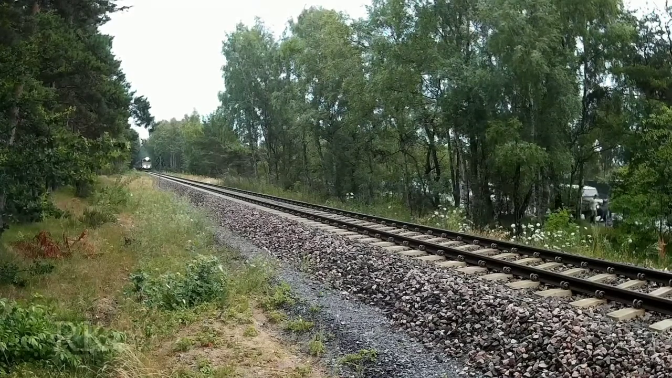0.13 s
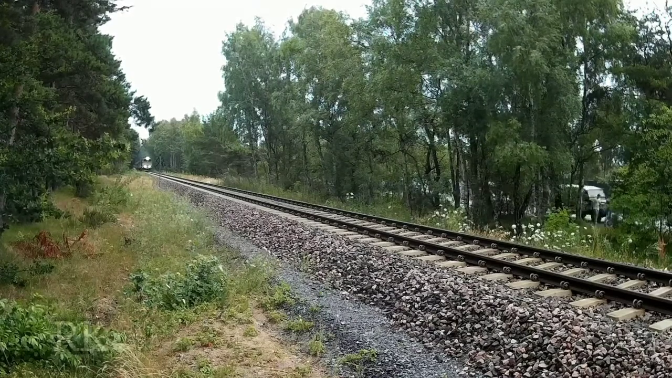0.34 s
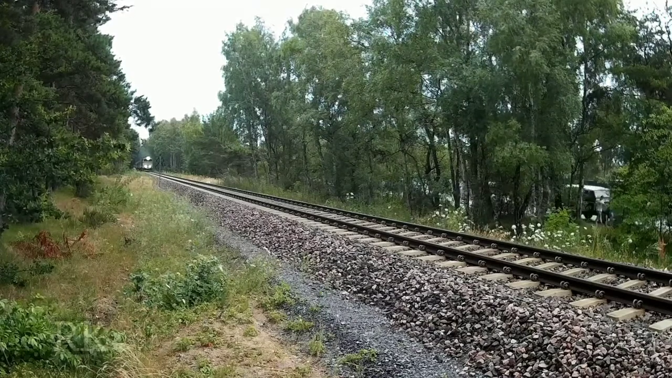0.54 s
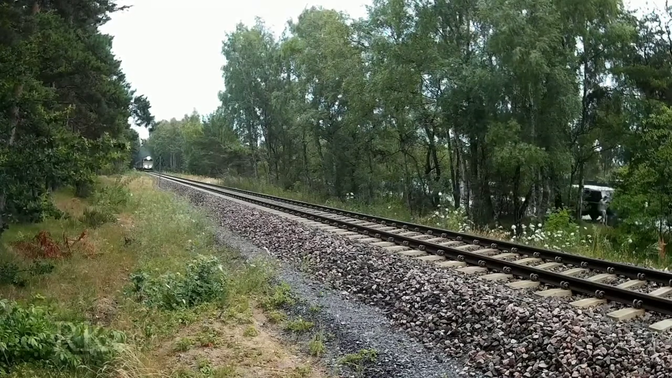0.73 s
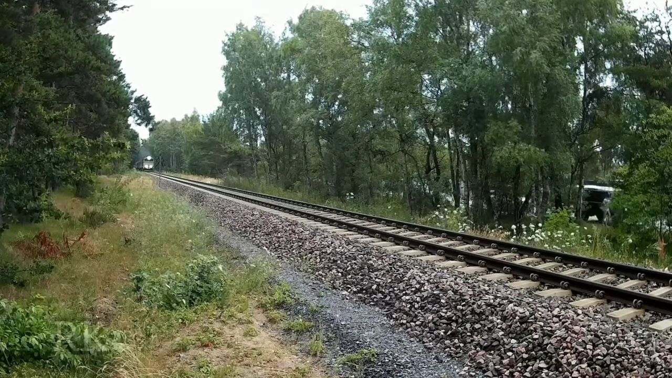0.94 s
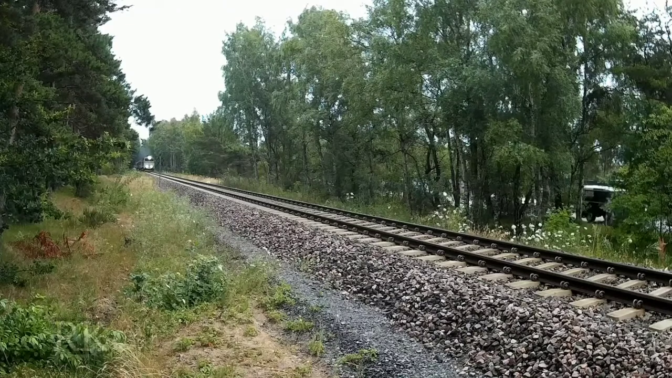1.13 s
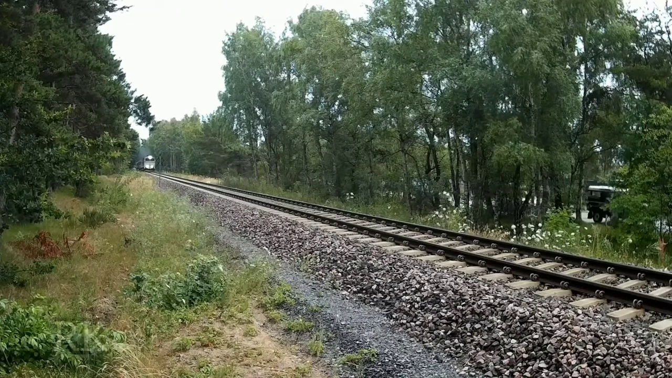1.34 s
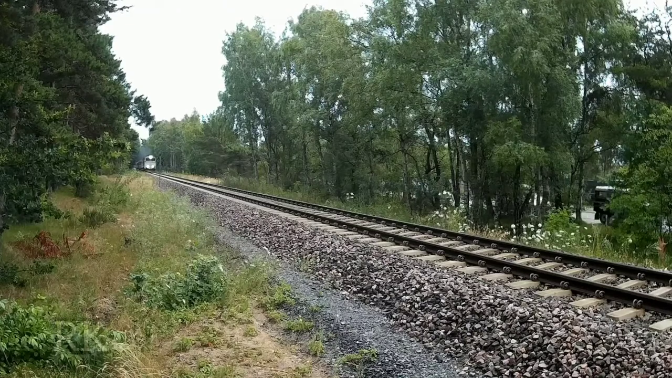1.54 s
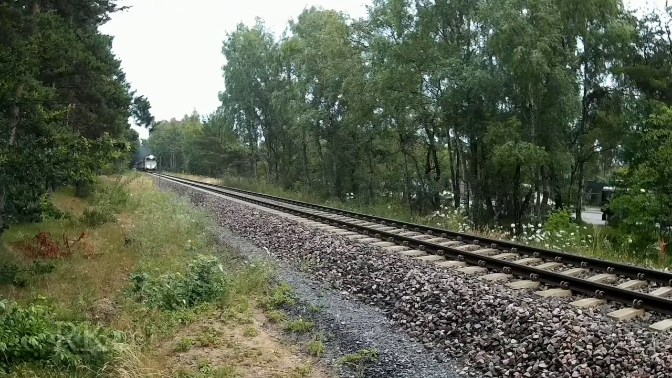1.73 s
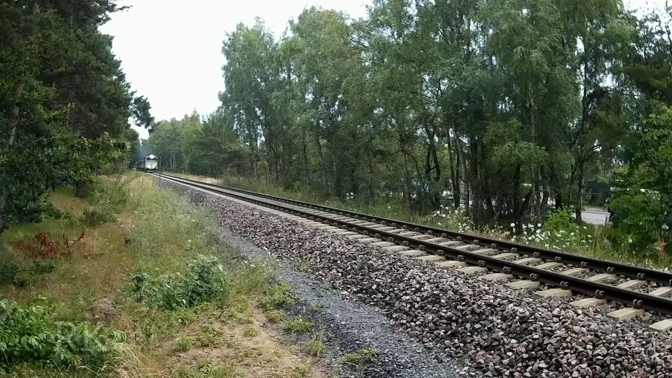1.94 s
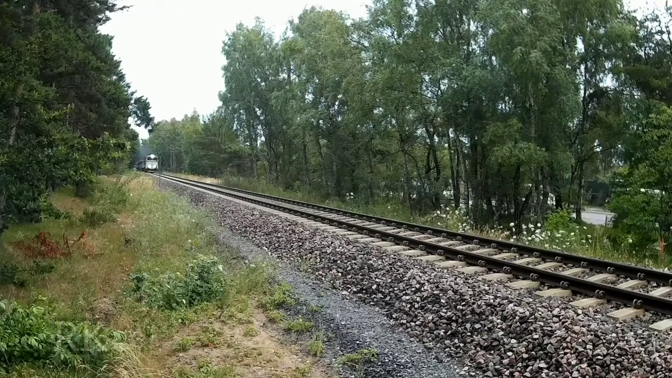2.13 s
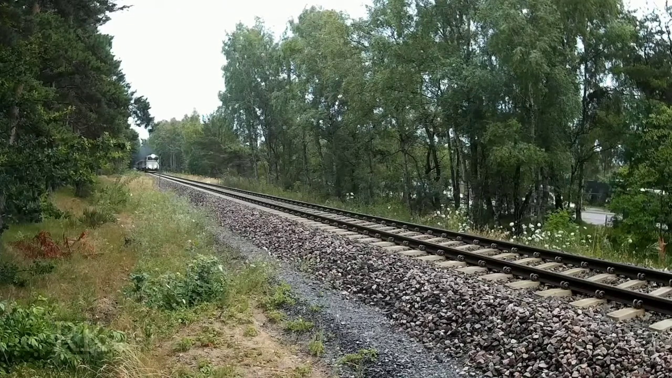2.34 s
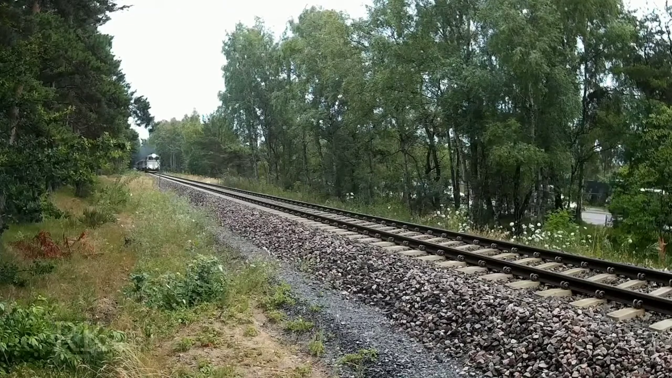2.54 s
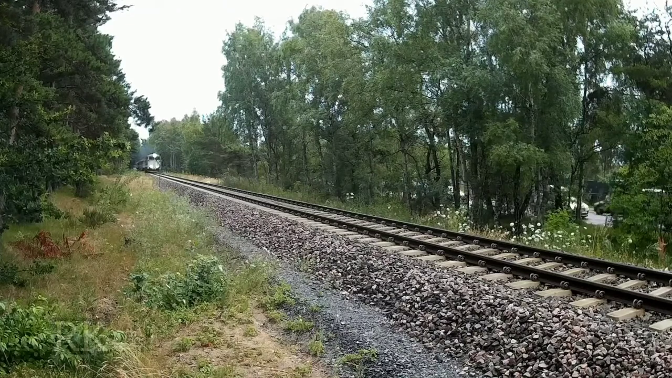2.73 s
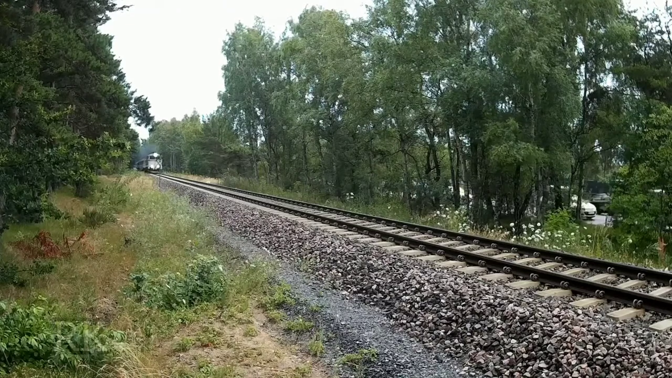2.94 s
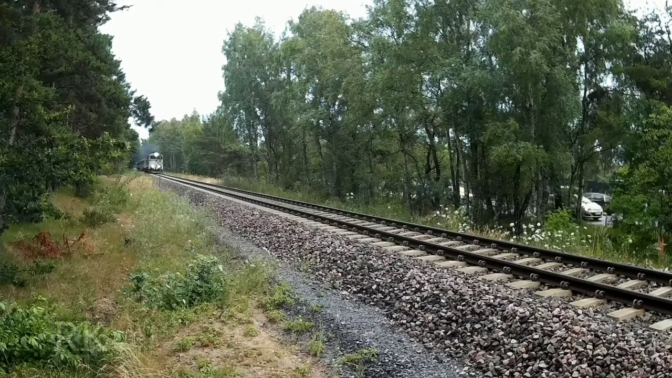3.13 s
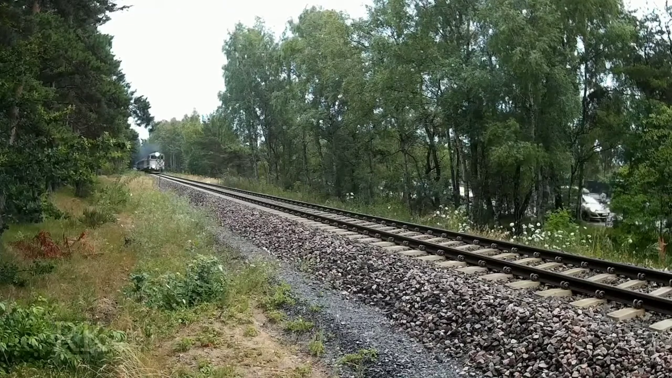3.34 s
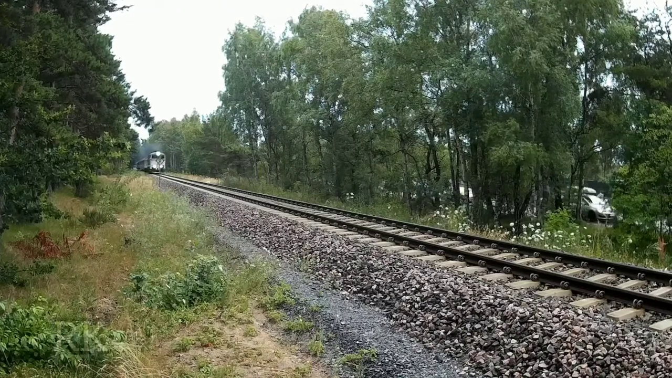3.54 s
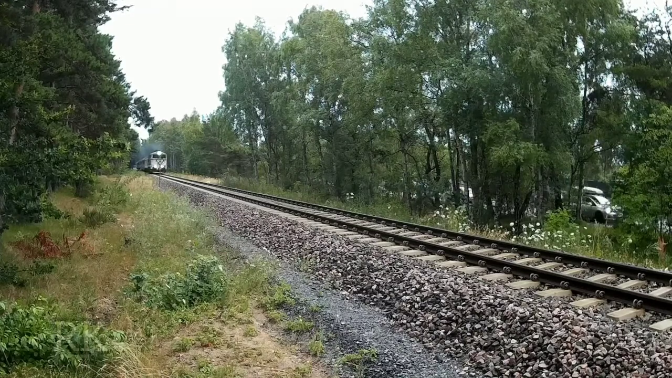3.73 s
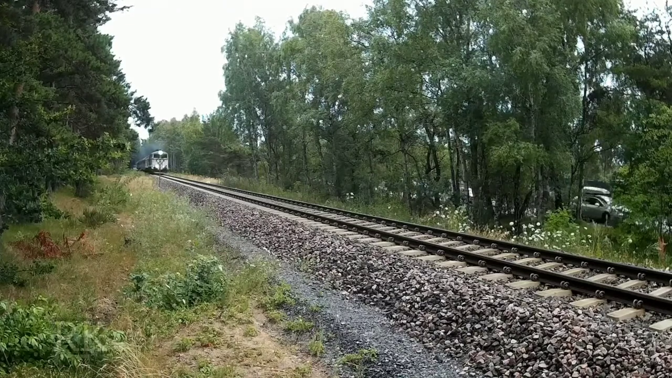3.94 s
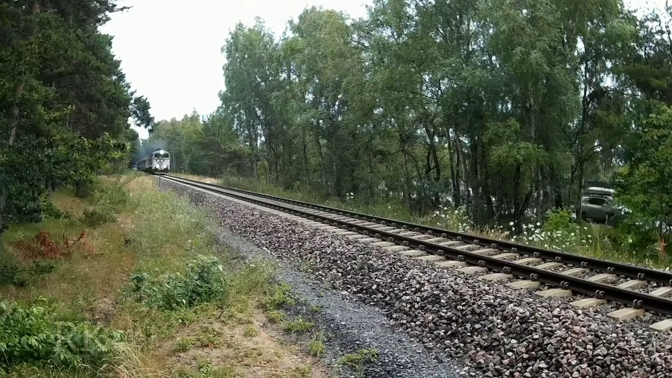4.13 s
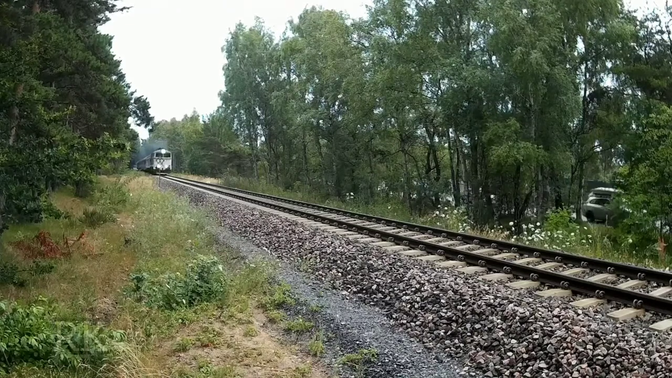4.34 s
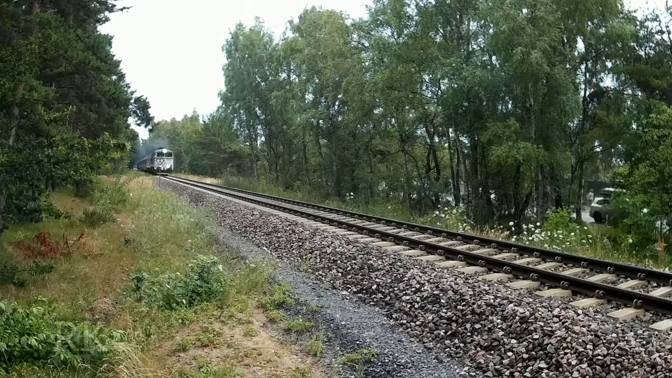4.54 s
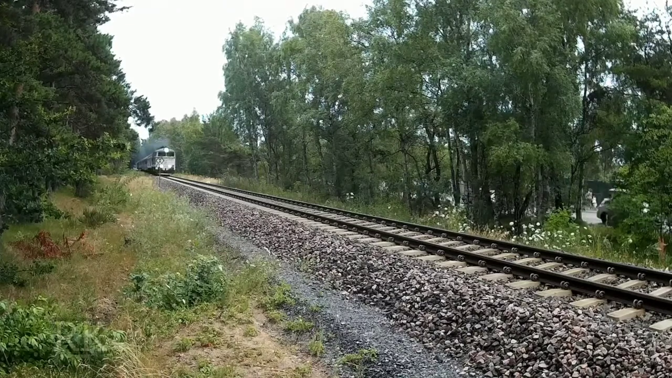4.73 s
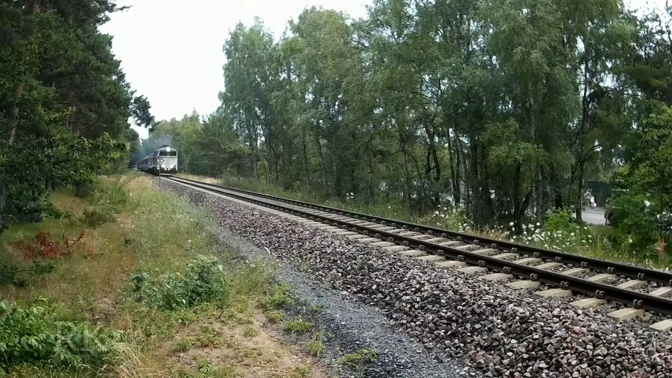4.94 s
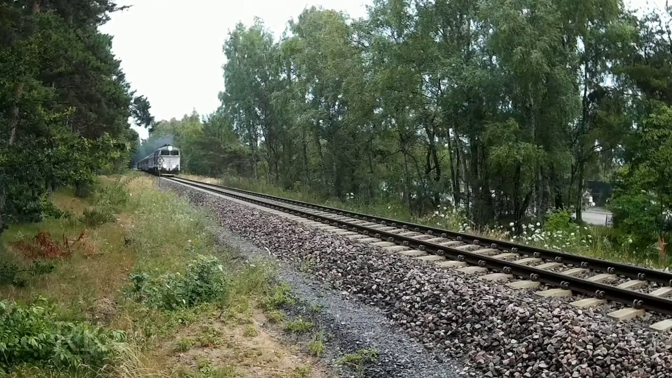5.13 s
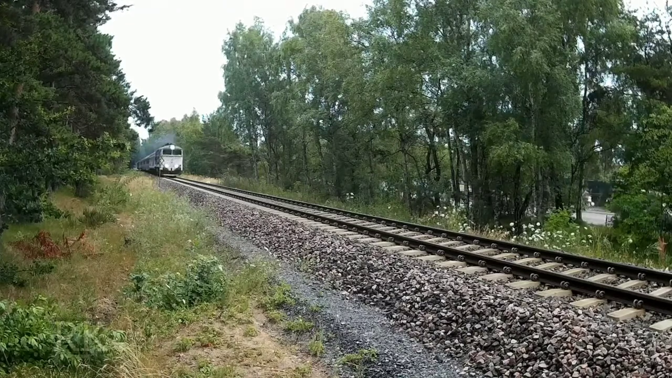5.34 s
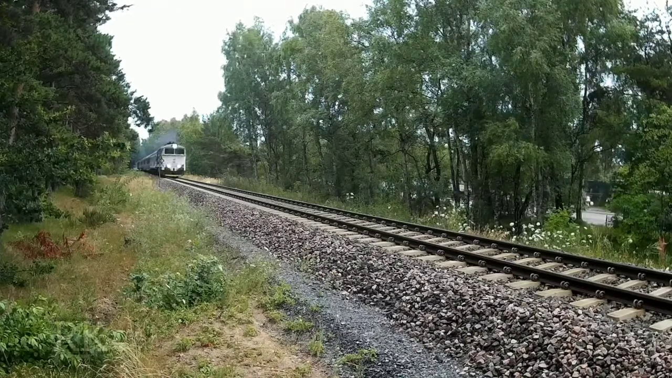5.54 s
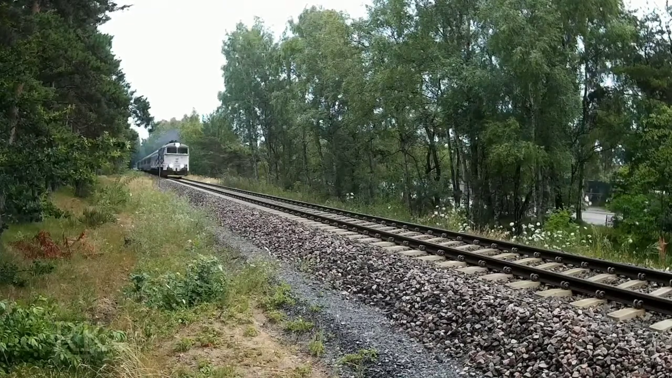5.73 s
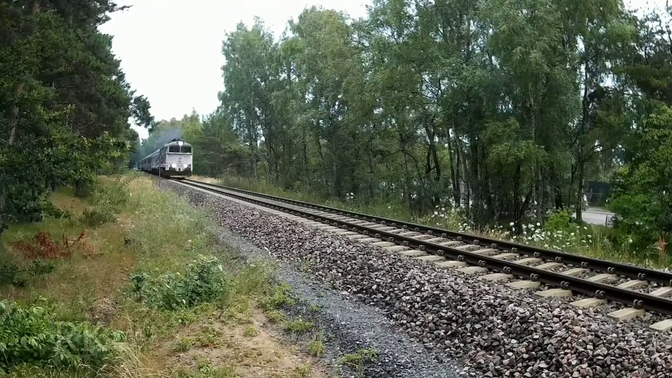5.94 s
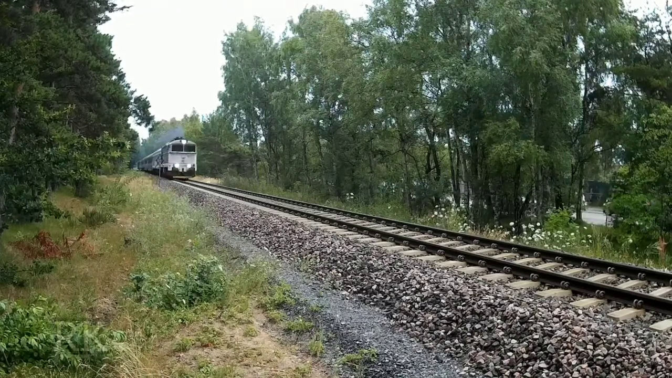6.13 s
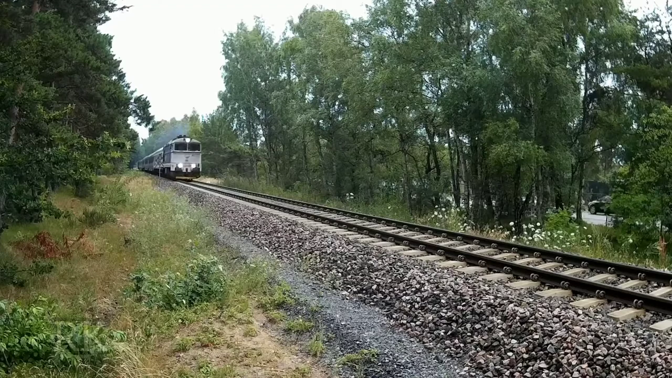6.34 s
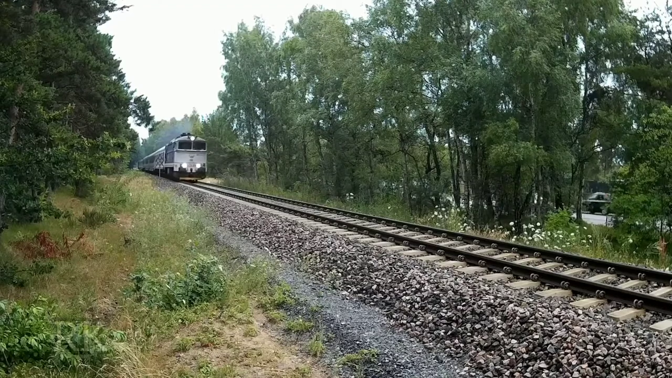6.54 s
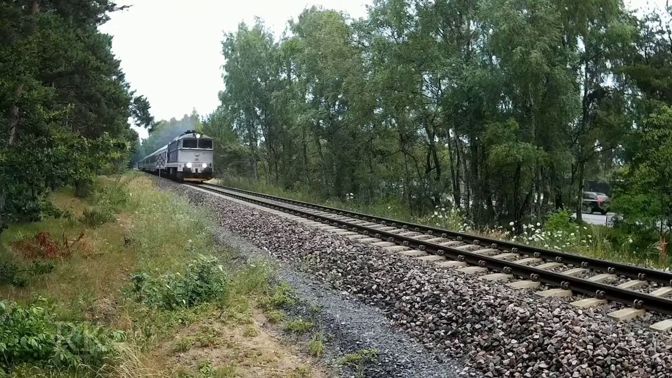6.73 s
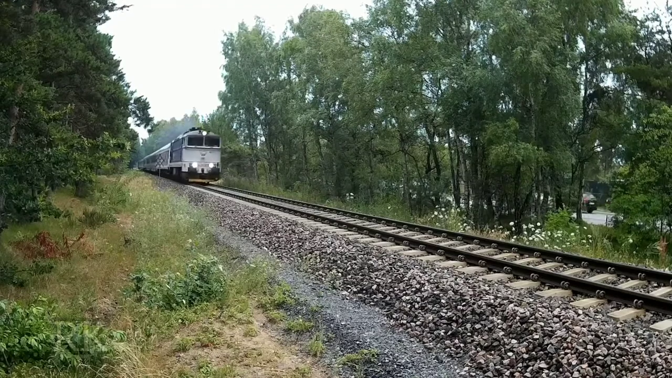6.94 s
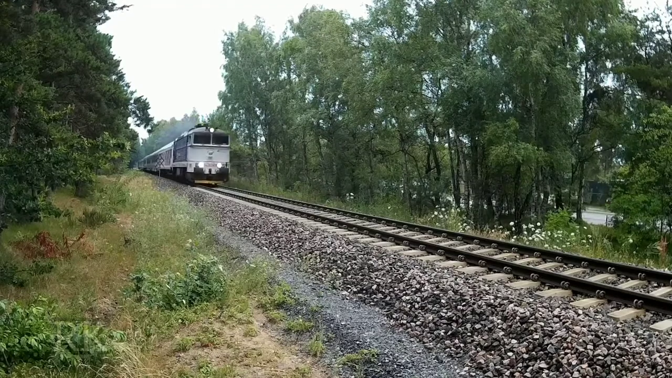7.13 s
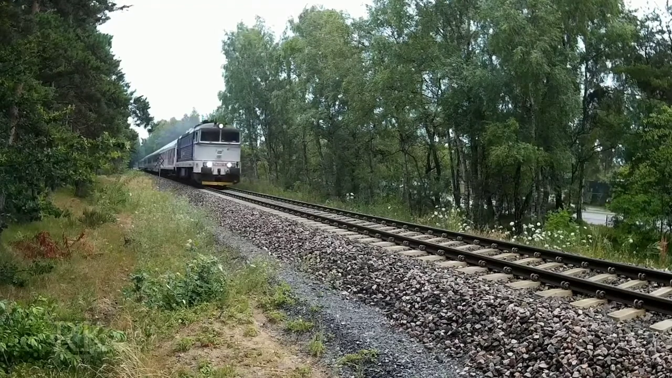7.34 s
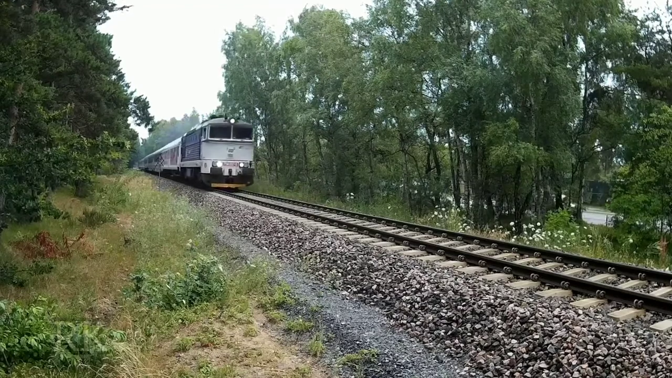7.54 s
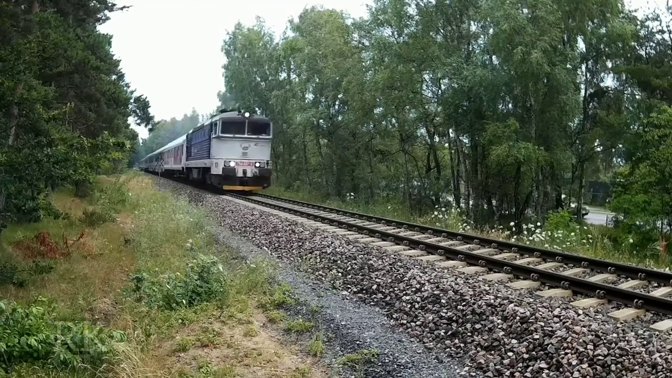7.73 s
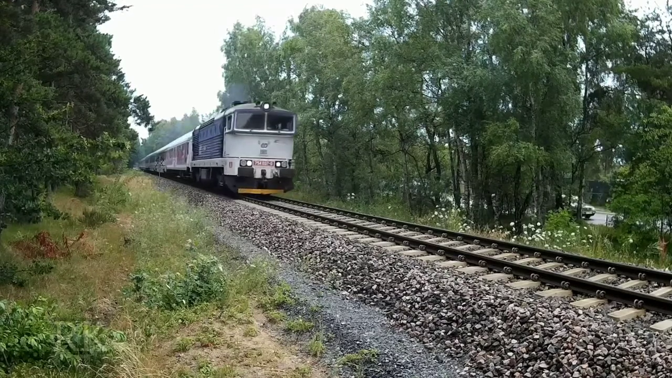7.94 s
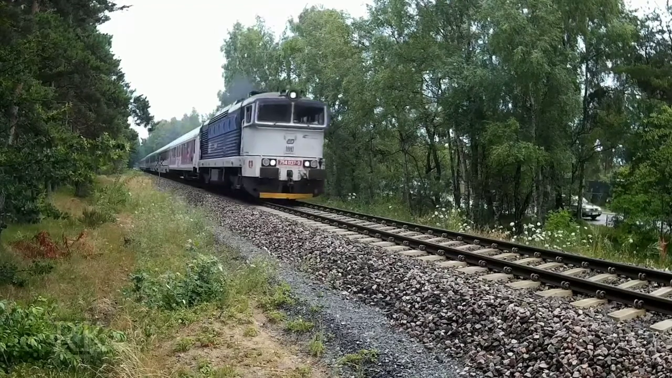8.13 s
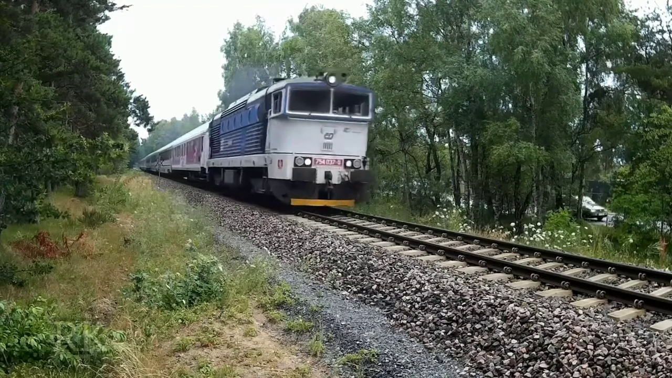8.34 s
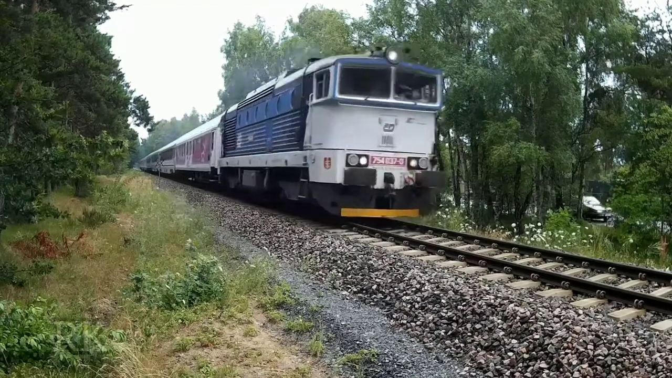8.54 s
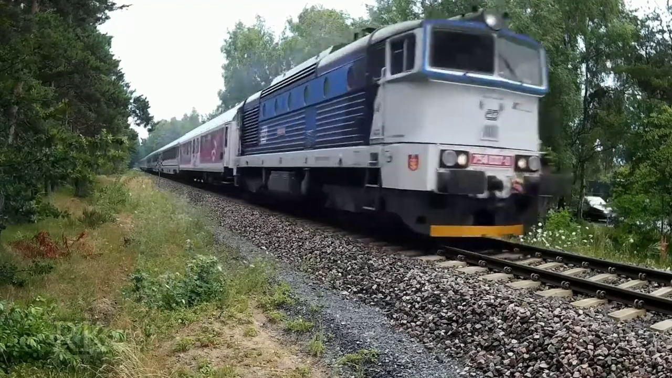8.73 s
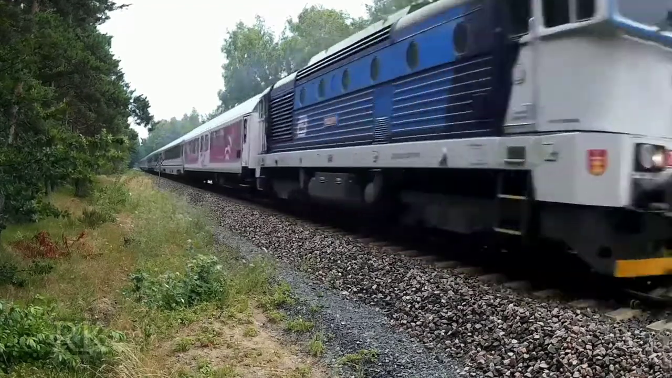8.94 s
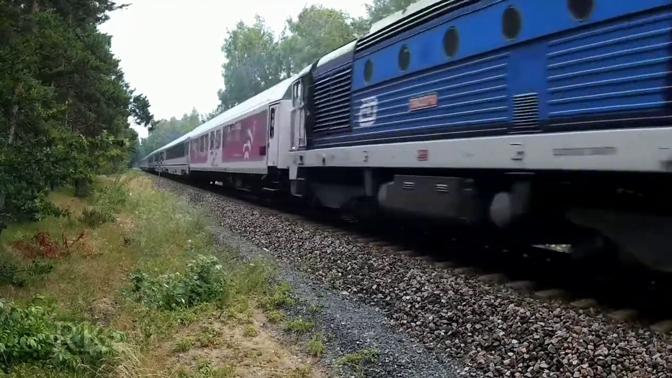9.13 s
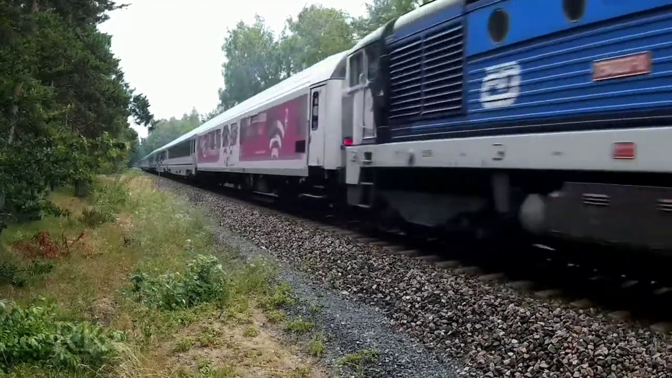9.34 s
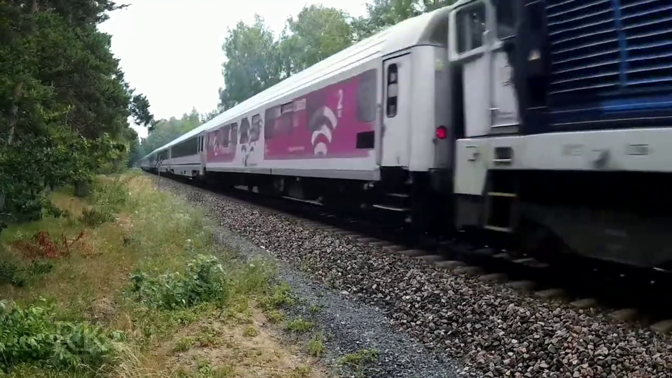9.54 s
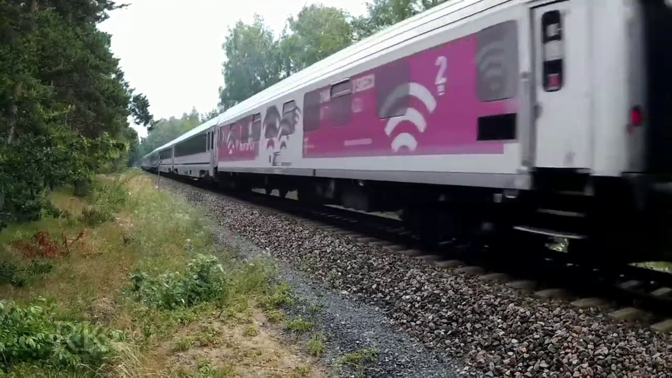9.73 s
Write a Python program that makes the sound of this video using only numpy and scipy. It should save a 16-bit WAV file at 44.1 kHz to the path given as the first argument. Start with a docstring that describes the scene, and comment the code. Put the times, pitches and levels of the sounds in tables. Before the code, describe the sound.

A diesel passenger train approaches with a throbbing engine and growing whine, then passes close with roaring, knocking and squealing wheels.

```python
"""Diesel train through the woods

A passenger train comes up a straight track and passes a few metres away. The engine throbs and
growls, and the wheels roar and hiss on the rails. Each axle sings on the rippled rail head, a moan
with a whine an octave above, sliding down as it goes by. Up close the running gear knocks, rasps
and squeals."""
import sys
import numpy as np
from scipy import signal
from scipy.fft import rfft, irfft, next_fast_len
from scipy.io import wavfile
from scipy.ndimage import uniform_filter1d, minimum_filter1d

SR = 44100
rng = np.random.default_rng(int(sys.argv[2]) if len(sys.argv) > 2 else 0)


def wav_record(signal):
    """Record a signal, one row per channel, as 16-bit PCM in the file named by sys.argv[1]."""
    frames = np.transpose(np.atleast_2d(signal))
    bounded = np.clip(frames, -1, 1)
    # unit amplitude maps onto the largest positive 16-bit level
    quanta = np.round(bounded * 32767).astype(np.int16)
    wavfile.write(sys.argv[1], SR, quanta)


N = 430857
TIME = np.arange(N) / SR
SPEED_M_S, SOUND_M_S, TRACK_DISTANCE_M = 19.5, 343, 3.8


def gain_of(db):
    """Decibels to amplitude."""
    return 10 ** (np.asarray(db) / 20)


def unit_rms(x):
    """Scales to rms 1."""
    return x / np.sqrt(np.mean(abs(x) ** 2) + 1e-20)


def steadied(x, span_s=0.17):
    """Evens out the slow swells of a tone and keeps its quick beating."""
    return x / np.sqrt(abs(uniform_filter1d(x ** 2, size=int(span_s * SR))) + 1e-12)


def curve_at(points, t=TIME):
    """An automation curve at the times t."""
    return np.interp(t, *np.transpose(points))


def spectrum_at(points, hz):
    """An EQ curve at the frequencies hz."""
    freqs, values = np.transpose(points)
    return np.interp(np.log(hz + 1), np.log(freqs), values)


def swell(peak_s, half_length_s, height, t=TIME):
    """A bell-shaped rise and fall."""
    return height * np.exp(-.5 * ((t - peak_s) / half_length_s) ** 2)


def phase_of(hz):
    """Running phase of a gliding pitch."""
    return 2 * np.pi * np.cumsum(hz) / SR


def flutter(width_hz, size=8192):
    """Slow complex noise of rms 1, about width_hz wide."""
    hz = np.fft.fftfreq(size, TIME[-1] / size)
    white = rng.standard_normal(size) + 1j * rng.standard_normal(size)
    slow = np.fft.ifft(white / (1 + (hz / width_hz) ** 2))
    return unit_rms(np.interp(TIME, np.linspace(0, TIME[-1], size), slow))


def fuzzy_tone(phase, width_hz):
    """A tone that follows the phase, spread into a line about width_hz wide."""
    return (flutter(width_hz) * np.exp(1j * phase)).real


def band_noise(centre_hz, width_hz, size=N):
    """Noise in one broad resonance."""
    padded = next_fast_len(size, True)
    hz = np.fft.rfftfreq(padded, 1 / SR)
    spectrum = rfft(rng.standard_normal(padded)) / (1 + ((hz - centre_hz) / width_hz) ** 4)
    return unit_rms(irfft(spectrum, padded)[:size])


def passing(abeam_s):
    """Distance (m) and facing (1 oncoming, -1 leaving) of a point that goes by at abeam_s."""
    ahead_m = SPEED_M_S * (abeam_s - TIME)
    distance_m = np.hypot(ahead_m, TRACK_DISTANCE_M)
    return distance_m, ahead_m / distance_m


def doppler(abeam_s):
    """Pitch factor of a passing point: sharp on the way in, flat on the way out."""
    _, facing = passing(abeam_s)
    return 1 / (1 - SPEED_M_S / SOUND_M_S * facing)


# How well sound carries along the cutting through the trees: time_s, gain_db
CARRY_CURVE = [(0, 1.5), (.45, -1), (.8, -0.5), (.9, 1.3), (1.9, 0.6), (3.2, -0.7), (3.97, -0.5),
               (4.13, 1.9), (5.35, 0.5), (5.6, -0.1), (8.5, -0.25), (9.77, 1)]
def approach_db(law, t=TIME, arrival_s=8.933):
    """Spreading and absorption from the nearest wheels; after arrival some are always alongside."""
    alongside_db, loss_db_per_doubling, loss_db_per_m = law
    distance_m = np.hypot(SPEED_M_S * np.maximum(arrival_s - t, 0), TRACK_DISTANCE_M)
    spreading_db = loss_db_per_doubling * np.log2(distance_m / TRACK_DISTANCE_M)
    absorbed_db = loss_db_per_m * (distance_m - TRACK_DISTANCE_M)
    return alongside_db - spreading_db - absorbed_db + curve_at(CARRY_CURVE, t)


# Crossfade from the far sound (0) to the close sound (1): time_s, close_share
CLOSE_MIX = [(0, 0.38), (3.5, 0.44), (5.5, 0.46), (7.5, 0.7), (8.8, 1), (9.77, 1)]
def air_fading_db(depth_db, rate_hz):
    """Moving air makes a tone come and go while the train is far off."""
    return depth_db * (1 - curve_at(CLOSE_MIX)) * unit_rms(flutter(rate_hz).real)


# Treble resonances of the microphone housing: centre_hz, width_hz, gain_db
HOUSING_PEAKS = [(3190, 130, 2), (3578, 180, 6), (5660, 390, 6), (7120, 210, -2), (7640, 320, 4),
                 (8900, 350, -0.5), (9800, 350, 6), (12000, 390, 5.5)]
def housing_db(hz):
    """The bumps that the housing puts on the treble."""
    return sum(swell(centre, width, db, hz) for centre, width, db in HOUSING_PEAKS)


# A puff of wind: peak_s, half_length_s, level_db
BREEZE_GUST = (1.01, 0.075, -44)
def breeze():
    """One soft low gust on the microphone before the train is near."""
    peak_s, half_s, db = BREEZE_GUST
    return band_noise(centre_hz=50, width_hz=70) * swell(peak_s, half_s, gain_of(db))


# Fader ride of the fan: time_s, gain_db
FAN_FADER = [(0, -58), (4.4, -54.5), (5.1, -42), (5.5, -46.5), (6.2, -38.5), (6.6, -53), (8.2, -32)]
def cooling_fan(abeam_s, pitch_hz=443, trim_db=-3):
    """The locomotive's fan hums on one wavering tone."""
    hum = steadied(fuzzy_tone(phase_of(pitch_hz * doppler(abeam_s)), width_hz=1.7))
    return hum * gain_of(curve_at(FAN_FADER) + trim_db)


# EQ of the exhaust's comb of engine orders: freq_hz, gain_db
GROWL_EQ = [(80, 5), (130, -8.5), (190, -11), (245, 0), (300, 7), (370, 1), (395, 1.5), (412, -6),
            (600, -14), (800, -40)]
def exhaust_growl(cycle_phase, even_orders_db=-6, paths=4, size=4096):
    """The uneven firing pattern repeats every cycle, arriving by several paths that fade in and out."""
    order = np.arange(size // 2 + 1)
    hz = order * CYCLE_RATE[0][1]
    in_band = (hz > GROWL_EQ[0][0]) & (hz < GROWL_EQ[-1][0])
    comb = gain_of(spectrum_at(GROWL_EQ, hz) + even_orders_db * (order % 2 == 0)) * in_band
    position = cycle_phase / (2 * np.pi) % 1 * size
    growl = np.zeros(N)
    for _ in range(paths):
        cycle = irfft(comb * np.exp(2j * np.pi * rng.random(len(order))))
        growl += np.interp(position, np.arange(size), cycle) * flutter(width_hz=1.43).real
    return steadied(growl, span_s=0.19)


# The firing order and its neighbours: cycle_multiple, relative_db
BOOM_ORDERS = [(2, -19), (3, -10), (4, -24), (5, -11), (6, 0.5), (7, -15), (8, -17), (9, -8.5), (12, -16.5),
               (14, -13.5), (18, -17.5), (21, -13.5), (27, -12.5), (33, -16), (39, -15.5), (43, -9),
               (44, -14.5), (45, -16)]
def engine_boom(cycle_phase, rough=0.07, rough_per_order=0.018):
    """Unequal cylinders throb against the firing order; higher tones waver more through the trees."""
    boom = np.zeros(N)
    for order, db in BOOM_ORDERS:
        phase = round(order) * cycle_phase + 2 * np.pi * rng.random()
        waver = (rough + rough_per_order * order) * fuzzy_tone(phase, width_hz=1.7)
        boom += gain_of(db) * unit_rms(np.cos(phase) + waver)
    return boom * gain_of(air_fading_db(depth_db=3.5, rate_hz=8))


# Engine cycles, each firing every cylinder once: time_s, rate_hz
CYCLE_RATE = [(0, 8.15), (3, 8.14), (5.5, 8.11), (9.77, 8.11)]
# Fader ride of boom and growl, muffled as the nose goes by, full from the flank: time_s, gain_db
ENGINE_FADER = [(0, -50.5), (1.4, -50.5), (2.1, -46), (3.7, -45), (4.35, -42), (4.8, -42.5), (6.1, -40),
                (7.6, -34), (8.6, -29), (9.05, -39), (9.24, -27), (9.5, -30), (9.77, -51)]
# Growl against boom: time_s, relative_db
GROWL_BALANCE = [(0, -5), (2.5, -0.5), (4.3, -1.5), (5.4, -1.5), (6.6, -9), (8.3, -1)]
def engine(abeam_s=9.3, trim_db=-1.5):
    """Boom, growl and fan of a diesel at steady revs, dropping in pitch as it passes."""
    cycle_phase = phase_of(curve_at(CYCLE_RATE) * doppler(abeam_s))
    drone = engine_boom(cycle_phase) + exhaust_growl(cycle_phase) * gain_of(curve_at(GROWL_BALANCE))
    return drone * gain_of(curve_at(ENGINE_FADER) + trim_db) + cooling_fan(abeam_s)


# Brief swells and ebbs in roar and rail ring: peak_s, half_length_s, roar_lift_db, rail_ring_lift_db
ROAR_SWELLS = [(4.35, .3, 0.5, 0), (5.193, 0.06, 1, 3.5), (7.752, 0.62, 4.5, -1.5), (9.36, 0.11, 1, 1.5)]
# How each band grows on the approach: alongside_db, loss_db_per_doubling, loss_db_per_m
BODY_RUMBLE = (-20, 5.57, 0.0048)
SLEEPER_ROAR = (-19, 4.93, 0.041)
RAIL_RINGING = (-23, 2.55, 0.091)
WHEEL_HISS = (-25.5, 3, 0.076)
def rolling_levels_db(t):
    """Levels of rumble, roar, rail ring and hiss; the middle two briefly swell and ebb."""
    roar_lift = sum(swell(s, half, db, t) for s, half, db, _ in ROAR_SWELLS)
    ring_lift = sum(swell(s, half, db, t) for s, half, _, db in ROAR_SWELLS)
    return [approach_db(BODY_RUMBLE, t), approach_db(SLEEPER_ROAR, t) + roar_lift,
            approach_db(RAIL_RINGING, t) + ring_lift, approach_db(WHEEL_HISS, t)]


# Ranges of rumble, roar, rail ring and hiss: low_hz, high_hz
NOISE_BANDS = [(130, 420), (580, 900), (1150, 1500), (2500, 6000)]
# Colour of the rolling noise from afar and close by: freq_hz, gain_db
FAR_EQ = [(20, -76), (55, -80), (115, -76.5), (160, -75), (250, -73), (370, -66.5), (560, -77.5),
          (840, -70.5), (980, -67), (1170, -70.5), (1530, -73), (2150, -86.5), (2900, -85.5), (3400, -78.5),
          (5300, -98), (6700, -101), (8000, -99), (9200, -108), (14500, -113)]
CLOSE_EQ = [(20, -63), (55, -47.5), (120, -53.5), (225, -42.5), (420, -46), (620, -37), (820, -43.5),
            (990, -37), (1170, -42), (1600, -45.5), (2150, -57.5), (3200, -56.5), (7000, -75),
            (11500, -84.5), (14500, -100)]
def rolling(patchy_db=0.82, flicker_db=0.27, sway_db=0.43, trim_db=2.0, frame=2048, hop=512):
    """Rough wheels on rough rails: a roar that fills out as it nears and flickers in the moving air."""
    hz = np.fft.rfftfreq(frame, 1 / SR)
    t = np.arange(N // hop + 5) * hop / SR
    close = curve_at(CLOSE_MIX, t)[:, None]
    colour_db = (1 - close) * spectrum_at(FAR_EQ, hz) + close * spectrum_at(CLOSE_EQ, hz)
    # lift each band to its own level, crossfading between band centres
    power = gain_of(colour_db + housing_db(hz)) ** 2
    band_power = [power[:, (hz >= low) & (hz < high)].sum(1) for low, high in NOISE_BANDS]
    lift_db = np.transpose(rolling_levels_db(t) - 10 * np.log10(band_power))
    centres_hz = np.sqrt(np.prod(NOISE_BANDS, axis=1))
    crossfades = np.array([spectrum_at(np.c_[centres_hz, solo], hz) for solo in np.eye(len(centres_hz))])
    real, imag, patches = rng.standard_normal((3, len(t), len(hz)))
    patches = unit_rms(uniform_filter1d(uniform_filter1d(patches, size=6, axis=0), size=20, axis=1))
    flicker = unit_rms(uniform_filter1d(rng.standard_normal(len(t)), size=5))[:, None]
    sway = unit_rms(uniform_filter1d(rng.standard_normal(lift_db.shape), size=12, axis=0))
    shape_db = colour_db + (lift_db + sway_db * sway) @ crossfades + trim_db
    shape_db += patchy_db * patches + flicker_db * flicker
    spectra = (real + 1j * imag) * gain_of(shape_db)
    _, roar = signal.istft(spectra.T, nperseg=frame, noverlap=frame - hop)
    return roar[:N] * np.sqrt(3 / 4)


# Wheel modes, set against the hiss: pitch_hz, width_hz, relative_db
RING_MODES = [(1685, 13, -15), (2256, 8.9, -21), (3326, 17, -17.5), (4300, 15, -20), (4460, 11, -36),
              (5970, 15, -31)]
def wheel_ring(abeam_s=9.0):
    """Steel wheels ring faintly in their own modes under the hiss."""
    phase_per_hz = phase_of(doppler(abeam_s))
    ring = sum(gain_of(db) * fuzzy_tone(hz * phase_per_hz, width) for hz, width, db in RING_MODES)
    return ring * gain_of(approach_db(WHEEL_HISS))


# Fader ride of the scrape: time_s, level_db
SCRAPE_FADER = [(0, -108), (9.1, -62), (9.25, -38), (9.55, -52), (9.7, -33), (9.77, -33)]
# A short swell of very high hiss as the train passes: peak_s, half_length_s, level_db
TREBLE_SIZZLE = (9.38, .12, -56)
def flange_scrape(sizzle_db=-23):
    """A flange rubs the rail: a bright hiss with a fine sizzle on top."""
    peak_s, half_s, db = TREBLE_SIZZLE
    rub = gain_of(curve_at(SCRAPE_FADER))
    hiss = band_noise(centre_hz=4800, width_hz=500)
    sizzle = band_noise(centre_hz=13000, width_hz=2000)
    return hiss * rub + sizzle * (gain_of(sizzle_db) * rub + swell(peak_s, half_s, gain_of(db)))


# The squeal: peak_s, half_length_s, level_db, pitch_hz, width_hz
SQUEAL_NOTE = (9.5, 0.3, -43, 6059.5, 36)
def flange_squeal(abeam_s=10.0):
    """One flange squeals thinly, sliding down as it comes abeam."""
    peak_s, half_s, db, pitch_hz, width_hz = SQUEAL_NOTE
    tone = fuzzy_tone(phase_of(pitch_hz * doppler(abeam_s)), width_hz)
    return tone * swell(peak_s, half_s, gain_of(db))


# Rasps under the closest wheels: peak_s, half_length_s, level_db
RASP_CUES = [(8.828, 0.018, -27), (8.925, .02, -27.5), (9.104, 0.039, -30), (9.22, .025, -42),
             (9.31, 0.013, -27), (9.44, .012, -32), (9.497, 0.03, -26.5), (9.567, .01, -28),
             (9.617, 0.035, -32)]
def rail_rasps():
    """Each close wheel draws a short rasp from the rail head."""
    envelope = sum(swell(s, half, gain_of(db)) for s, half, db in RASP_CUES)
    return band_noise(centre_hz=3120, width_hz=380) * envelope


# Hits of the running gear: start_s, gain_db, centre_hz, width_hz, decay_s
KNOCK_CUES = [(8.69, -21, 710, 700, 0.014), (8.795, -18, 300, 120, 0.019), (8.906, -20.5, 264, 109, 0.094),
              (8.945, -20, 1800, 2600, 0.023), (9.031, -17, 250, 90, 0.043), (9.264, -13, 290, 120, 0.025),
              (9.28, -17, 650, 400, 0.016), (9.32, -27, 960, 300, 0.014), (9.41, -11, 216, 89, 0.06),
              (9.45, -17.5, 340, 130, 0.023), (9.495, -8, 850, 302, 0.015), (9.532, -4, 845, 350, 0.011),
              (9.68, -16, 253, 50, 0.03)]
def bogie_knocks(attack_s=0.0045):
    """Short jolts of the passing bogies, each dying away in one broad resonance."""
    out, t = np.zeros(N), np.arange(SR // 2) / SR
    for start_s, db, centre_hz, width_hz, decay_s in KNOCK_CUES:
        envelope = gain_of(db) * (1 - np.exp(-t / attack_s)) * np.exp(-t / decay_s)
        knock = band_noise(centre_hz, width_hz, len(t)) * envelope
        slot = out[round(start_s * SR):][:len(t)]
        slot += knock[:len(slot)]
    return out


# Ripples crossed per second as the train gathers speed: time_s, rate_hz
RIPPLE_RATE = [(0, 481.5), (1, 484.3), (3.3, 489), (4.5, 492.3), (6.6, 497.3), (7.9, 500), (9.77, 500)]
def ripple_phase(abeam_s):
    """Phase of the rail ripples under one axle, with its own Doppler slide."""
    return phase_of(curve_at(RIPPLE_RATE) * doppler(abeam_s))


# The singing axles and their balance: abeam_s, moan_db, whine_db
SINGING_AXLES = [(9.22, -8, 0), (9.35, -6, 1), (9.691, -2, -4), (9.83, -7.5, -2), (10.15, -4.5, -2)]
# Swells and ebbs with the depth of the ripples: peak_s, half_length_s, whine_lift_db, moan_lift_db
RIPPLE_SURGES = [(0.2, 0.04, 5.5, 14), (.5, .06, -4, 0), (.62, .035, 5, 0), (0.748, .04, -6, 0),
                 (0.878, 0.044, 5, -1), (1.06, 0.08, 2, 4), (1.363, 0.12, 3.5, 8), (1.53, 0.025, 6, 6),
                 (1.69, 0.026, -6, 0), (1.924, 0.06, 5.5, -1), (2.087, .04, -6, 2), (2.3, 0.09, 2, 3),
                 (2.622, 0.02, 2, 6), (2.79, 0.027, 4.5, 2), (2.93, .035, 0, 9), (3.224, 0.1, -6.5, 0.5),
                 (3.85, 0.13, -3.5, 2), (4.4, 0.23, -2, -4), (4.75, 0.05, -5.5, 5), (5.228, 0.034, 3, -1),
                 (5.42, 0.018, -2, -3), (5.648, 0.16, 3.5, -6), (5.793, .02, 7, 6), (6.18, 0.049, -4, 0),
                 (6.475, 0.18, 3.5, 0), (6.926, 0.011, 5, 3), (7.124, 0.11, 3.5, 4),
                 (7.634, 0.093, 2.5, -6), (7.884, 0.019, -8, 1), (7.935, 0.033, 5.5, 7.5),
                 (8.3, 0.096, -3, 5), (8.547, 0.051, -5, -8), (8.784, 0.0081, -13, -4),
                 (8.99, .012, -6, -10), (9.152, .02, 4, 1), (9.242, 0.01, -10, 0), (9.414, 0.045, -1, -6)]
# How the moan grows: alongside_db, loss_db_per_doubling, loss_db_per_m
MOAN_APPROACH = (-20.5, 5.5, 0.12)
def axle_moan(forward_db=3, blur=0.86):
    """Each axle moans at the ripple rate, louder ahead than behind and blurring as it goes by."""
    moan = np.zeros(N)
    for abeam_s, moan_db, _ in SINGING_AXLES:
        phase = ripple_phase(abeam_s)
        distance_m, facing = passing(abeam_s)
        tone = steadied(fuzzy_tone(phase, width_hz=2.7))
        tone += blur * (1 - facing) * fuzzy_tone(phase, width_hz=20)
        moan += tone * gain_of(moan_db + forward_db * facing) / distance_m
    surge_db = sum(swell(s, half, db) for s, half, _, db in RIPPLE_SURGES)
    return steadied(moan, span_s=0.14) * gain_of(approach_db(MOAN_APPROACH) + surge_db)


# Harmonics of the moan: ripple_multiple, width_hz, relative_db
MOAN_HARMONICS = [(3, 2.6, -1), (4, 7.8, -14.5), (5, 12, -15.5), (6, 13, -14)]
# How they grow: alongside_db, loss_db_per_doubling, loss_db_per_m
HARMONICS_APPROACH = (-27.5, 3.9, 0.12)
def moan_overtones():
    """The ripples also drive higher harmonics, steadier than the moan itself."""
    overtones = np.zeros(N)
    for abeam_s, moan_db, _ in SINGING_AXLES:
        phase = ripple_phase(abeam_s)
        distance_m, _ = passing(abeam_s)
        tones = sum(gain_of(db) * fuzzy_tone(k * phase, width) for k, width, db in MOAN_HARMONICS)
        overtones += tones * gain_of(moan_db) / distance_m
    return steadied(overtones) * gain_of(approach_db(HARMONICS_APPROACH))


# Side tones around the whine: ripple_multiple, width_hz, relative_db, far_lift_db
CLUSTER_TONES = [(1.825, 12, -10, 15), (1.934, 2.5, 0, 3), (1.925, 30, 2, 4.5), (2.04, 63, -1.5, -1),
                 (2.9, 14, -8, 4.5)]
# How much of the far lift is in: time_s, far_share
FAR_MIX = [(0, 0.95), (3.3, 1), (5.2, 0.2), (9.77, 0.07)]
def whine_cluster(phase, distance_m, close_db=-9):
    """A haze of tones around one axle's whine, thinning as the axle comes close."""
    far = curve_at(FAR_MIX)
    cluster = sum(gain_of(db + far_db * far) * fuzzy_tone(k * phase, width)
                  for k, width, db, far_db in CLUSTER_TONES)
    return cluster * gain_of(close_db * np.sqrt(TRACK_DISTANCE_M / distance_m))


# How the whine grows: alongside_db, loss_db_per_doubling, loss_db_per_m
WHINE_APPROACH = (-17.5, 2.67, 0.11)
def axle_whine(shield_db=0.5, bounce_depth=0.19, bounce_hz=13):
    """Each axle whines at twice the ripple rate, trembling as the wheels bounce on the ripples."""
    whine = np.zeros(N)
    for abeam_s, _, whine_db in SINGING_AXLES:
        phase = ripple_phase(abeam_s)
        distance_m, _ = passing(abeam_s)
        tone = steadied(fuzzy_tone(2 * phase, width_hz=1.6)) + whine_cluster(phase, distance_m)
        shadow_db = shield_db * np.minimum(distance_m / TRACK_DISTANCE_M, 3)  # bodies hide far wheels
        whine += tone * gain_of(whine_db - shadow_db) / distance_m
    surge_db = sum(swell(s, half, db) for s, half, db, _ in RIPPLE_SURGES)
    level_db = approach_db(WHINE_APPROACH) + surge_db + air_fading_db(depth_db=2, rate_hz=4)
    bounce = unit_rms(1 + bounce_depth * unit_rms(flutter(bounce_hz).real))
    return steadied(whine, span_s=0.086) * bounce * gain_of(level_db)


# Howls: peak_s, half_length_s, level_db, axle_number (from 1), ripple_multiple (1 moan, 2 whine)
HOWL_CUES = [(7.503, 0.024, -21.5, 1, 2), (7.753, 0.028, -19, 1, 2), (8.12, 0.016, -19.5, 1, 2),
             (8.28, 0.015, -19.5, 1, 2), (8.715, 0.02, -23.5, 5, 1), (8.752, 0.017, -17, 1, 2),
             (8.926, 0.024, -14, 3, 1), (8.934, 0.016, -10, 1, 2), (8.971, 0.013, -6.5, 1, 2),
             (9.036, 0.011, -11.5, 1, 2), (9.07, 0.047, -17.5, 1, 1), (9.113, 0.055, -10.5, 5, 1),
             (9.197, 0.0095, -13, 1, 2), (9.294, 0.01, -10, 2, 2), (9.327, 0.0076, -9, 2, 2),
             (9.405, 0.019, -13.5, 2, 2), (9.58, 0.039, -13, 4, 2), (9.613, 0.043, -22, 3, 1),
             (9.76, 0.015, -12.5, 3, 2)]
def wheel_howls():
    """A wheel meets deep ripples and flares into a clean tone at its own axle's sliding pitch."""
    phases = [ripple_phase(abeam_s) for abeam_s, _, _ in SINGING_AXLES]
    out = np.zeros(N)
    for peak_s, half_s, db, axle, multiple in HOWL_CUES:
        phase = multiple * phases[axle - 1] + 2 * np.pi * rng.random()
        out += np.sqrt(2) * np.cos(phase) * swell(peak_s, half_s, gain_of(db))
    return out


# EQ of the stereo side signal: freq_hz, gain_db
SIDE_EQ = [(120, -95), (260, -76), (1100, -98), (1800, -20), (3800, -18.5), (6000, -22.5), (8000, -60)]
def stereo(mid, abeam_s=8.8, phase_rad=0.89, spread=0.54, side_db=-3.0):
    """Centred at first; the treble widens slightly as the train comes close."""
    size = next_fast_len(N, True)
    response = gain_of(spectrum_at(SIDE_EQ, np.fft.rfftfreq(size, 1 / SR))) * np.exp(1j * phase_rad)
    side = irfft(rfft(mid, size) * response, size)[:N]
    distance_m, _ = passing(abeam_s)
    width = np.maximum.accumulate(TRACK_DISTANCE_M / distance_m)  # opens up and stays open
    side *= gain_of(side_db) * width ** spread
    return np.array([mid - side, mid + side])


def scene():
    """The whole train and a breath of wind, in stereo."""
    bed = rolling() + wheel_ring() + engine() + breeze()
    running_gear = flange_scrape() + flange_squeal() + rail_rasps() + bogie_knocks()
    singing = axle_moan() + moan_overtones() + axle_whine() + wheel_howls()
    return stereo(bed + running_gear + singing)


# The level dips briefly: start_s, recovery_s
LEVEL_DIPS = [(3.978, 0.014), (7.977, 0.013)]
def record(dry, self_noise_db=-73, ceiling=1.0, cutoff_hz=15315):
    """Microphone colour and self-noise, two brief dips, a fast limiter and a low-pass."""
    size = next_fast_len(N + 2048, True)
    housing = gain_of(housing_db(np.fft.rfftfreq(size, 1 / SR)))
    mix = irfft(rfft(dry, size) * housing, size)[:, :N]
    mix += gain_of(self_noise_db) * rng.standard_normal(N)
    for start_s, recovery_s in LEVEL_DIPS:
        dip = np.where(TIME < start_s, 1, 1 - np.exp(-abs(TIME - start_s) / recovery_s))
        mix *= uniform_filter1d(dip, size=40)
    limiter_gain = np.minimum(1, ceiling / (abs(mix).max(0) + 1e-9))
    mix *= uniform_filter1d(minimum_filter1d(limiter_gain, size=201), size=201)
    low_pass = signal.firwin(511, cutoff_hz, window=("kaiser", 9), fs=SR)
    return signal.oaconvolve(mix, low_pass[None], "same")


dry = scene()
out = record(dry)
wav_record(out)
```